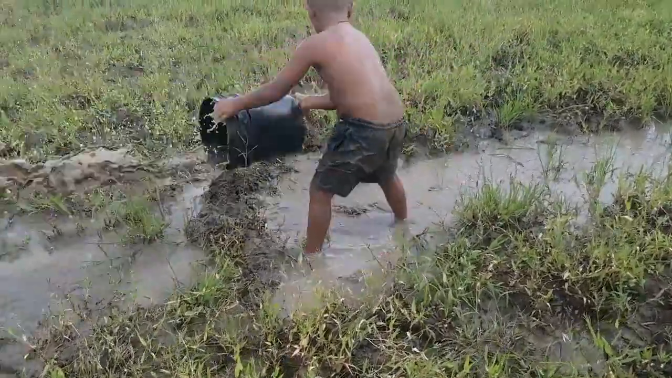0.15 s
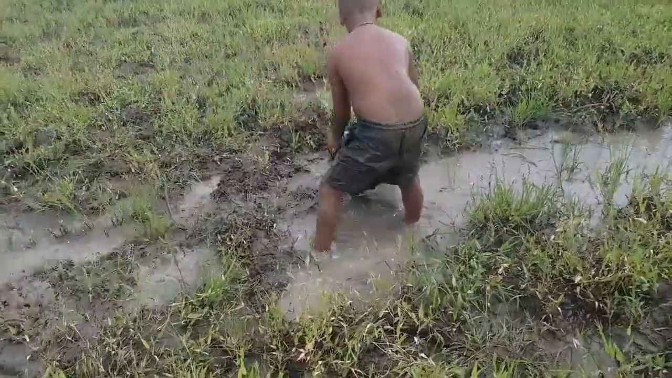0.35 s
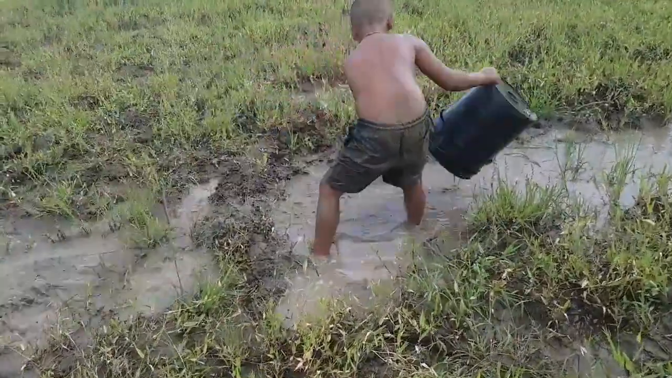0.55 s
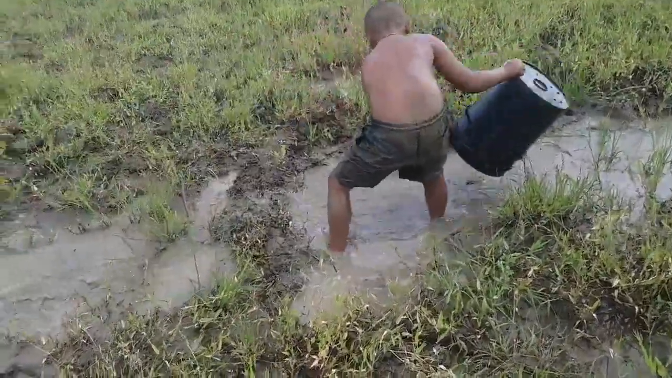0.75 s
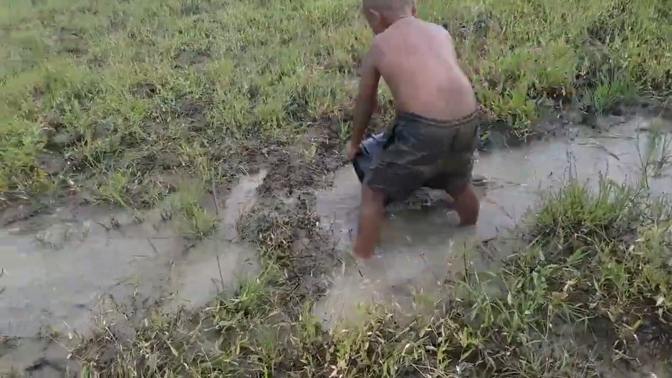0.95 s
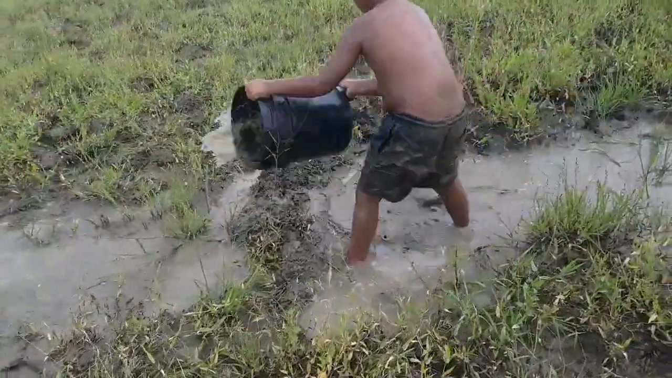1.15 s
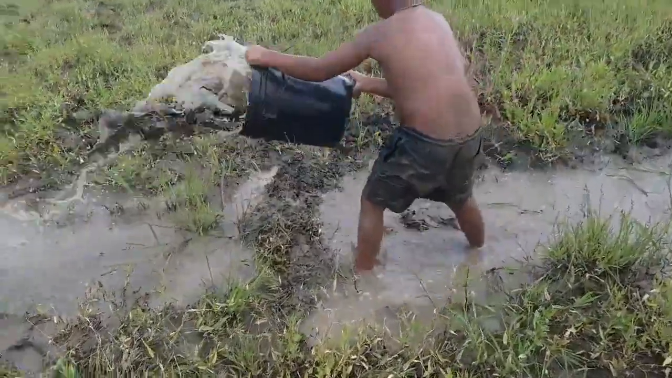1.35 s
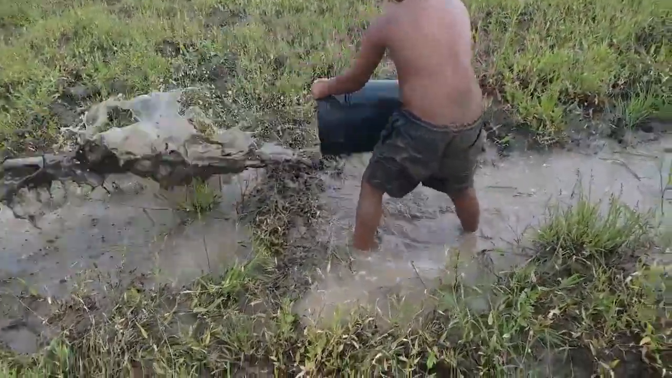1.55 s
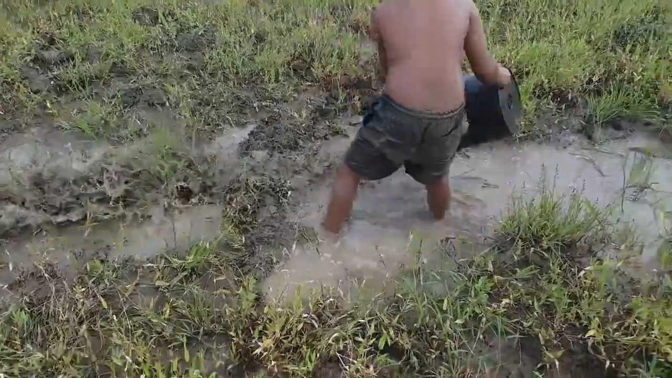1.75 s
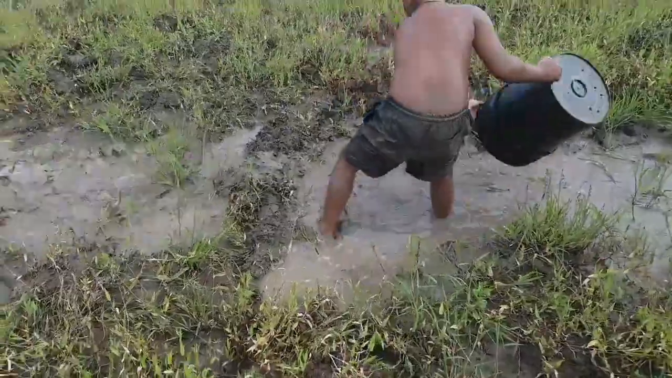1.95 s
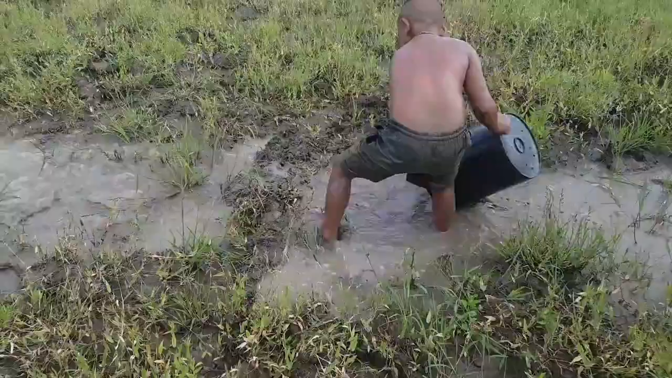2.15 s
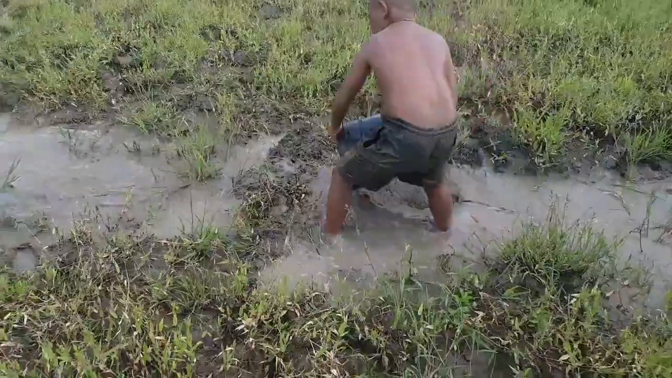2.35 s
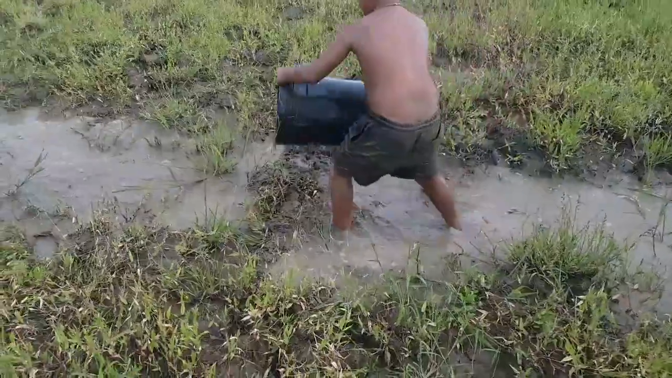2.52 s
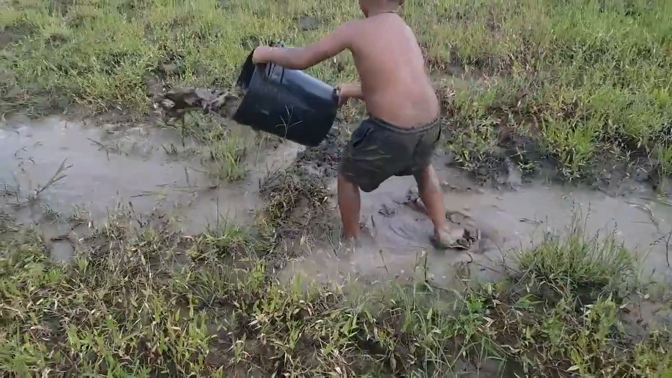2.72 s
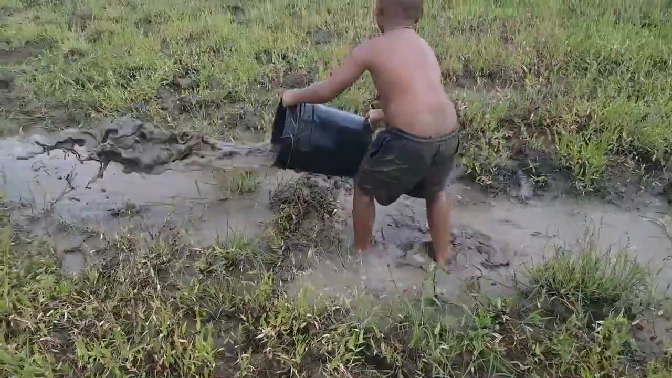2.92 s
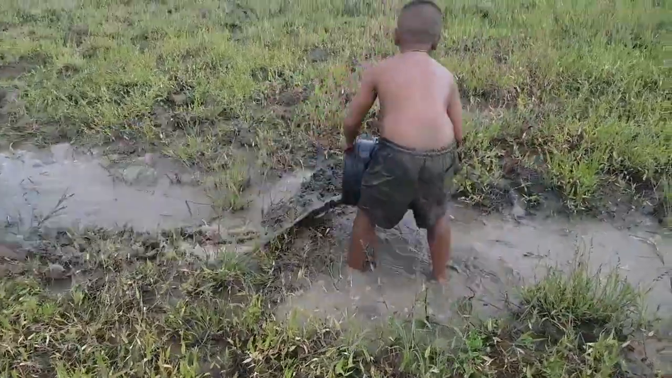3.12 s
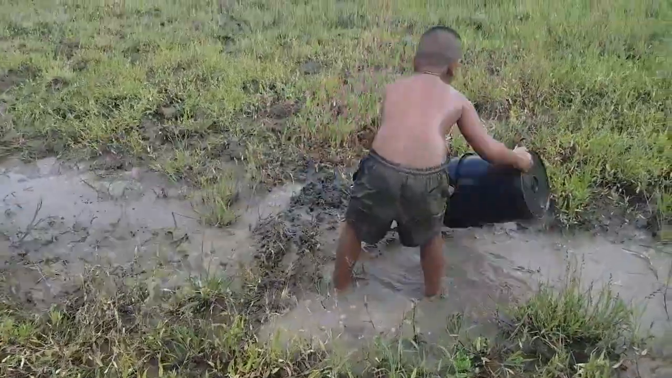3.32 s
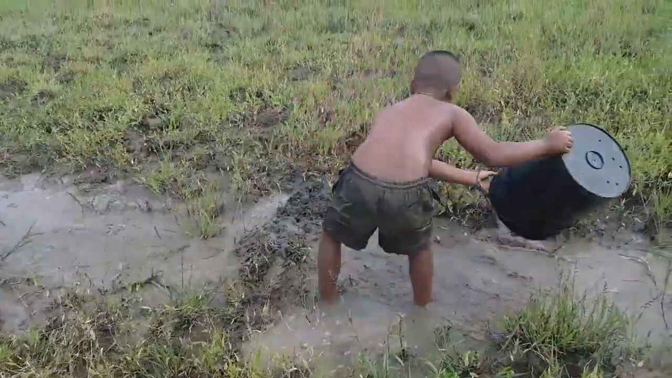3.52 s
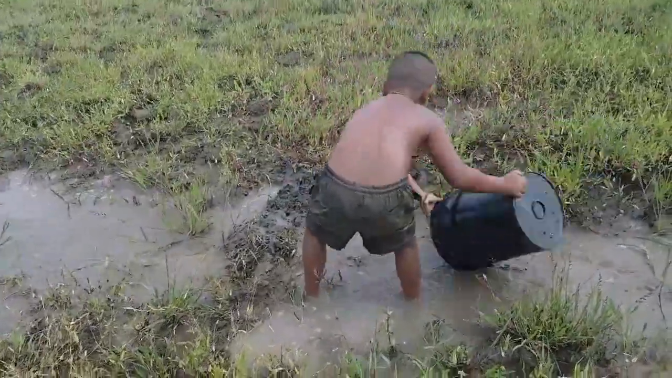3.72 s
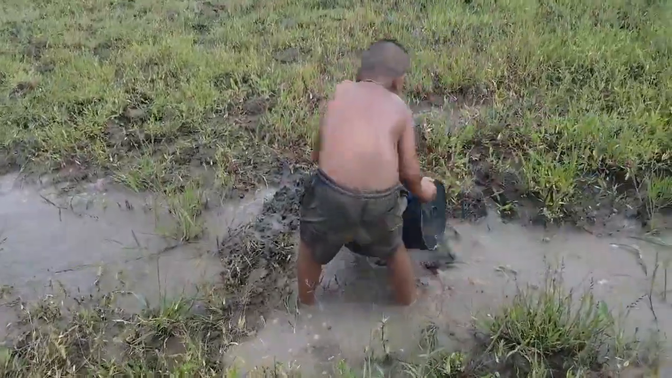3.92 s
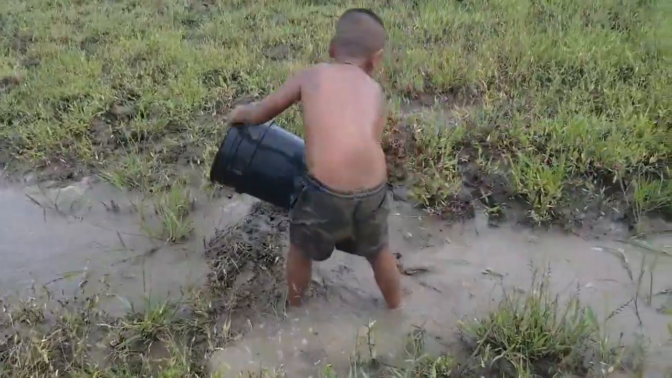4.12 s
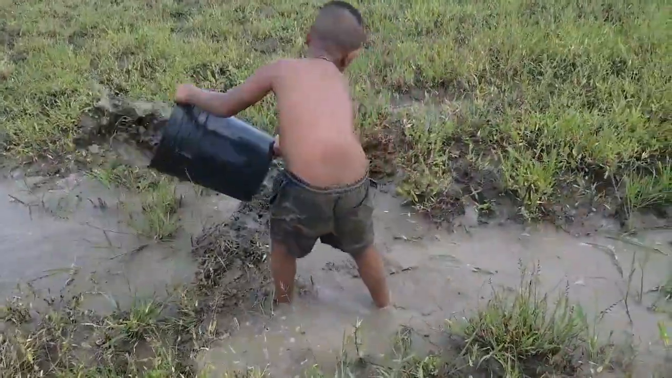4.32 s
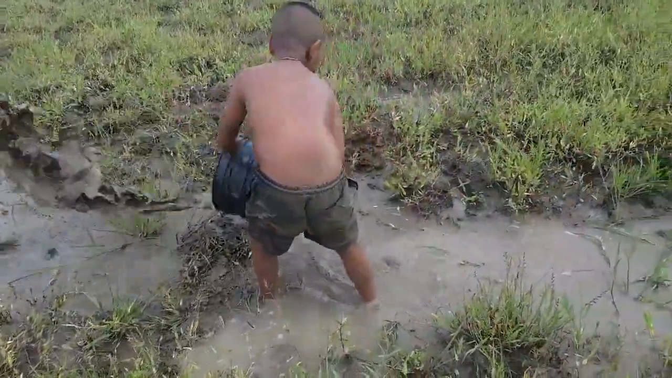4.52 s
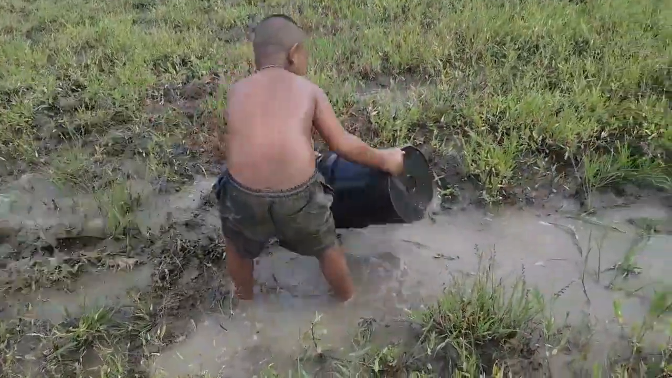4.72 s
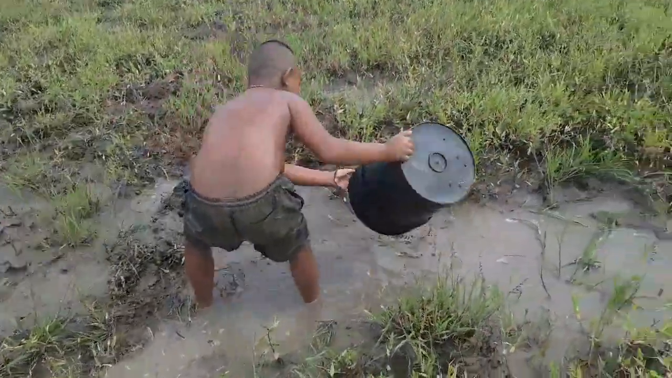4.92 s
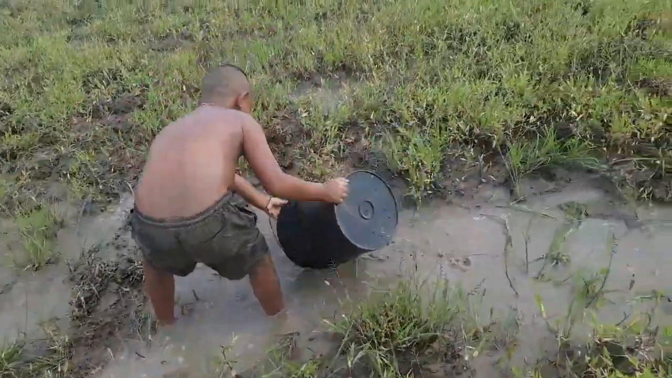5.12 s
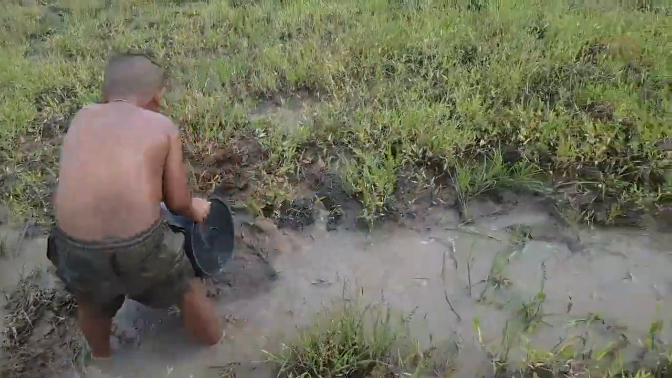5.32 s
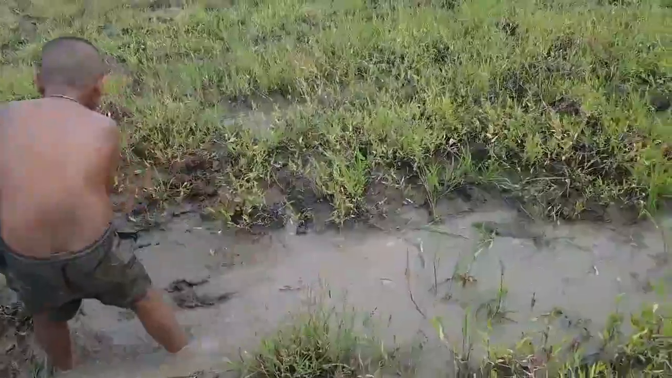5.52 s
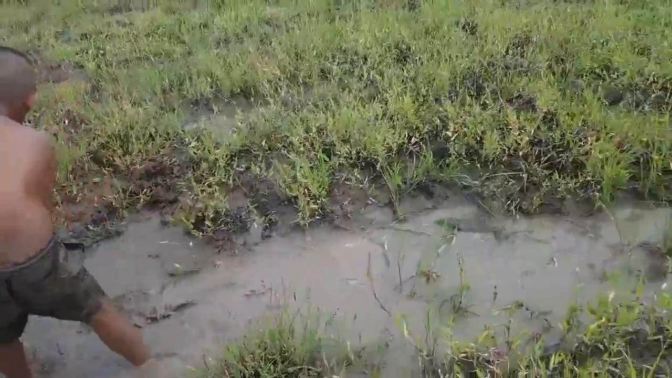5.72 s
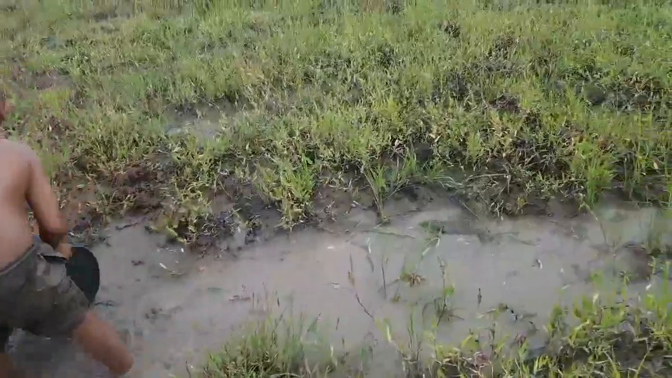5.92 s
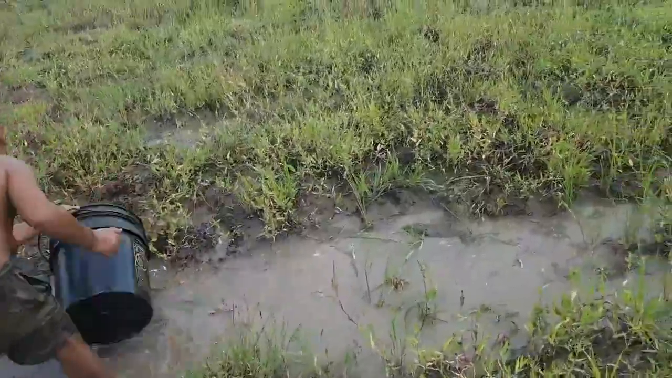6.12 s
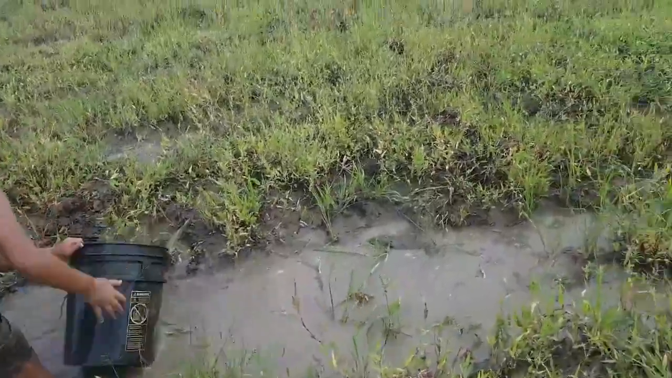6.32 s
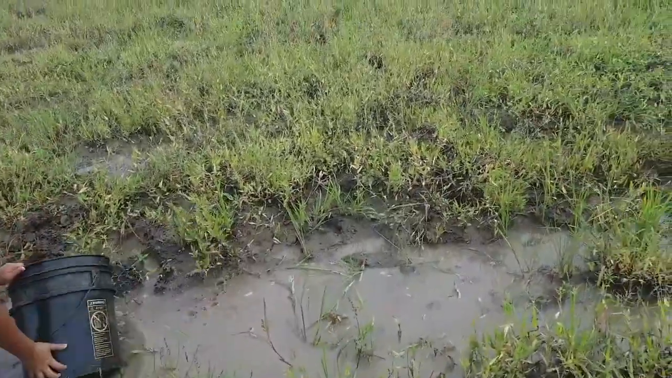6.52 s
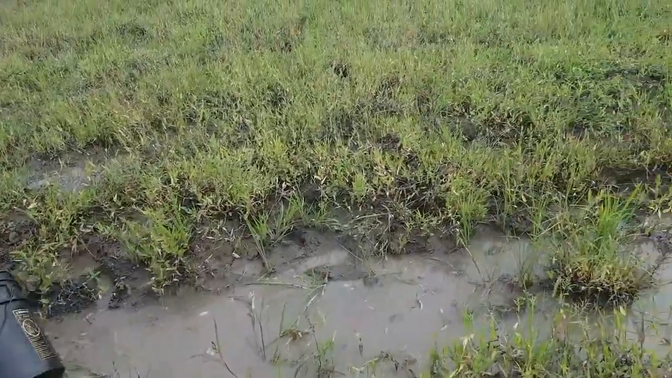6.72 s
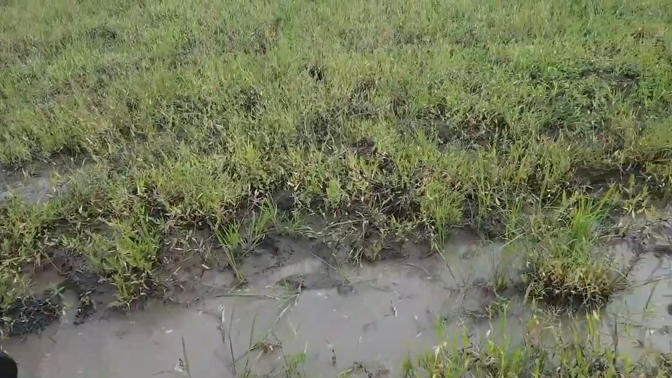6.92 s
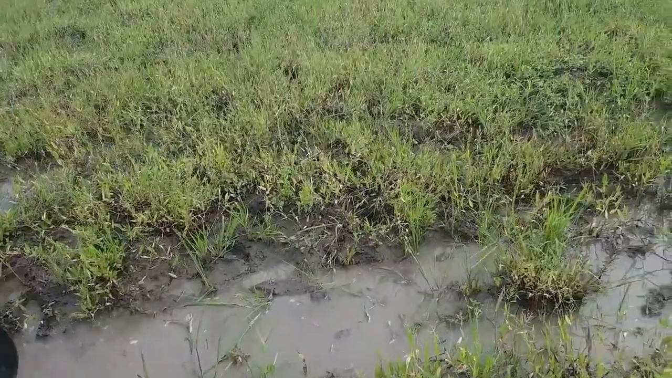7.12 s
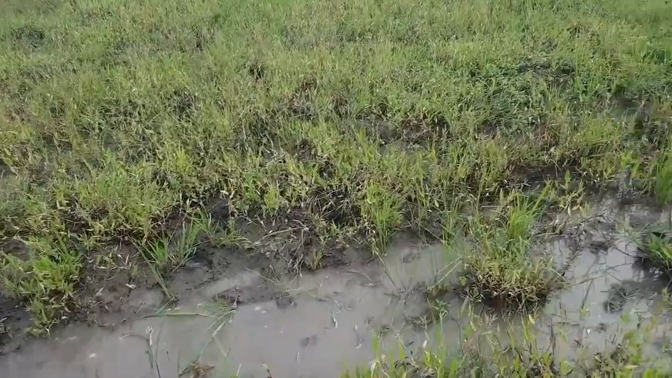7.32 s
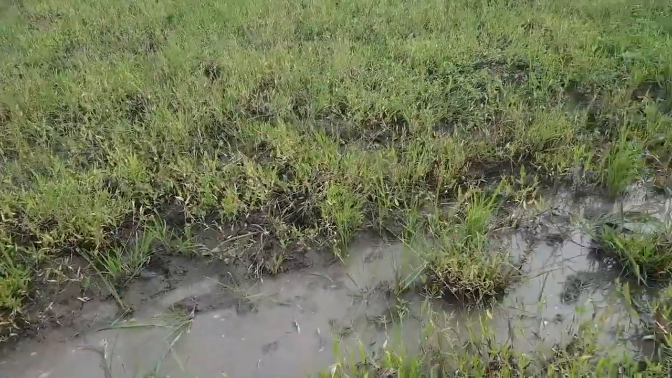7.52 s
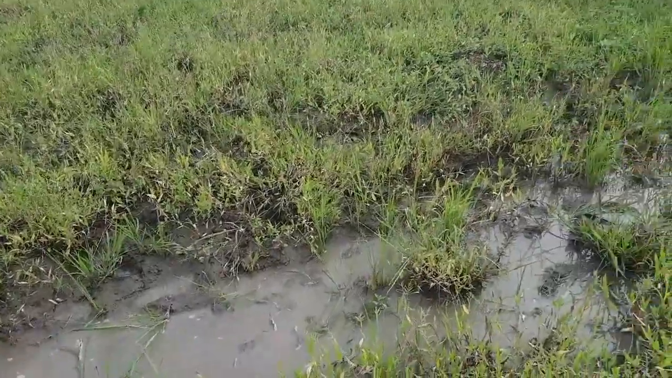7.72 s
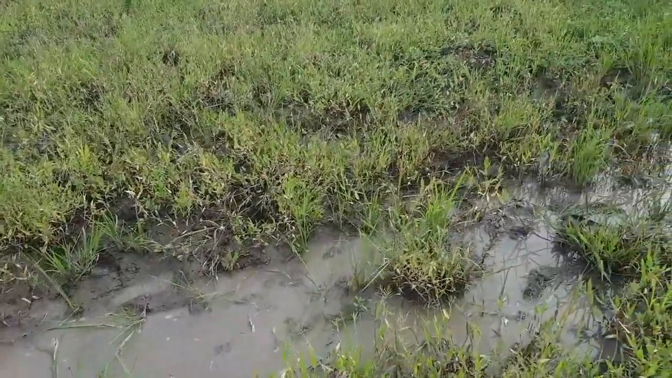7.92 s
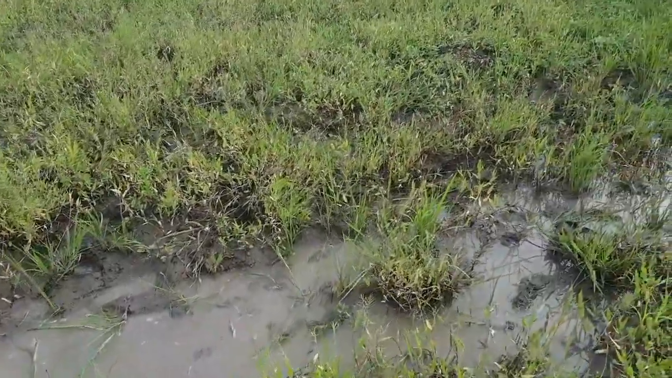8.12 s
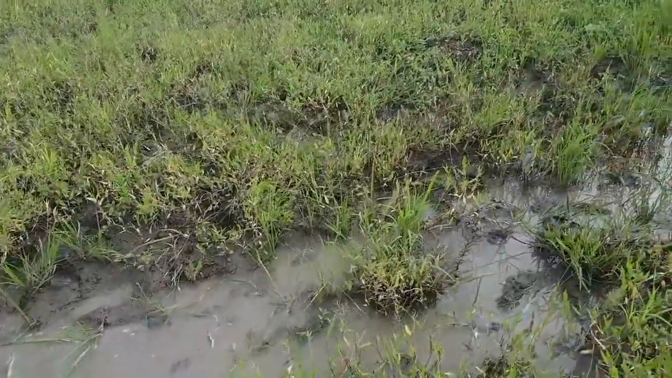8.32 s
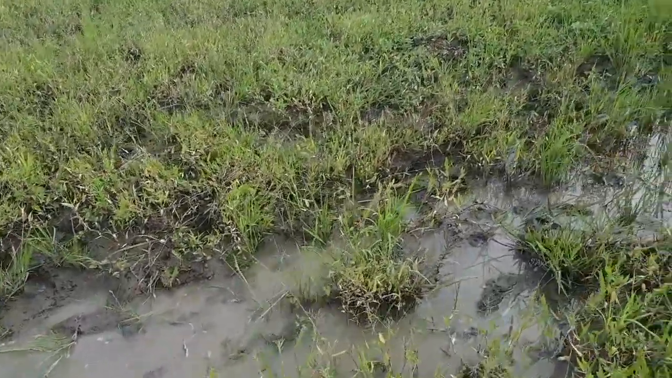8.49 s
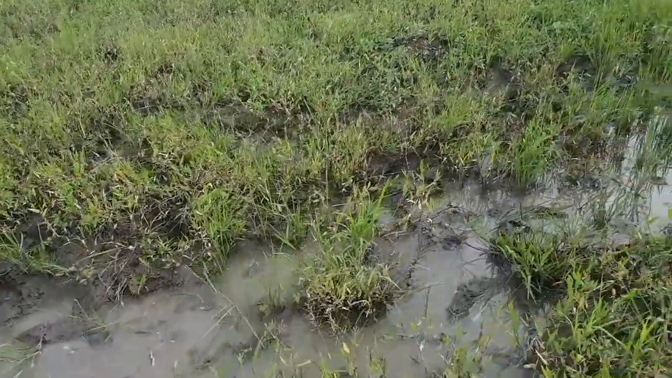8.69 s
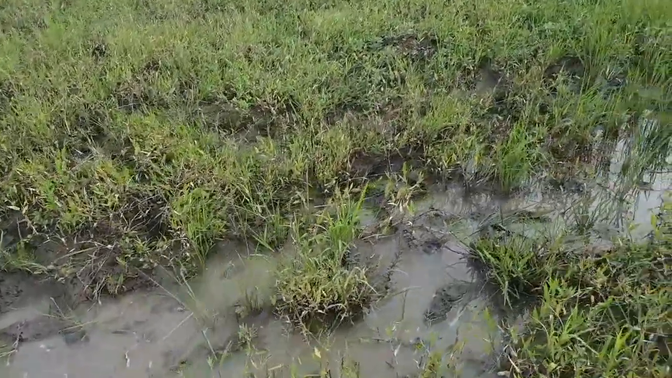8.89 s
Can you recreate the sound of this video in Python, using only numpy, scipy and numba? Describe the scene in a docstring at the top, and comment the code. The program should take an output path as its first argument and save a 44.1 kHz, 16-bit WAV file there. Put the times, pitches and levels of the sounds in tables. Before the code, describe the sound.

Close outdoor stereo from a handheld phone: a bucket plunges into a shallow puddle, gulps, and flings sheets of muddy water that slap down and patter. The rhythm is quick and irregular, then the scoops grow sparser and stronger, with dull plastic booms, trickling and single clear drips. A quiet airy hush, brief low wind thumps and a barely audible distant motor rising twice lie underneath.

```python
"""Someone bails a muddy puddle in an open field with a plastic bucket, a few metres from a phone.
Scooped and flung water gurgles, splashes and sprays: rains of short sines that swell, die and glide up.
Sheets of mud slap down in bursts of the same grains, lone drips ring, and the bucket booms on the water
while its wall modes ring along. Far off a small engine, two sines to a firing rate, revs up twice
over the hush of the field and low wind, both made of filtered noise."""
import sys
import numpy as np
from scipy import signal
from scipy.fft import rfft, irfft, next_fast_len
from scipy.io import wavfile
from scipy.ndimage import uniform_filter1d
from numba import njit

SR = 44100
rng = np.random.default_rng(int(sys.argv[2]) if len(sys.argv) > 2 else 0)


def output_pcm(signal):
    """Save a mono or channel-first signal as 16-bit PCM at the path in sys.argv[1].

    Samples are clipped to [-1, 1] before scaling.
    """
    pcm = np.clip(np.atleast_2d(signal).T, -1, 1) * 32767
    wavfile.write(sys.argv[1], SR, np.round(pcm).astype(np.int16))


N = 394694

# Slow level offset shared by the hush and the drizzle. Each row: time in seconds, offset in dB.
LULL = [(0, 4.5), (3, 1), (6.3, 6), (6.8, -7), (7.4, 0), (7.9, 3.5), (8.95, 3)]


def undb(db):
    """Turns decibels into an amplitude factor."""
    return 10 ** (np.asarray(db) / 20)


def unit(x):
    """Scales a signal to an rms of 1."""
    return x / np.sqrt(np.mean(x ** 2))


def walk(rate):
    """Random levels held 1 / rate s and slewed twice; spread near 1."""
    hold = int(SR / rate)
    steps = np.repeat(rng.standard_normal(N // hold + 1), hold)
    slewed = uniform_filter1d(uniform_filter1d(steps, hold), hold)
    return 4 / 3 * slewed[:N]


@njit
def ring(out, start, hz, t60, glide, size, rise):
    """Adds sines that swell, die and glide upward like bubbles nearing the surface."""
    for k in range(len(start)):
        first = max(int(np.ceil(start[k])), 0)
        late = first - start[k]  # a start between two samples keeps its exact phase
        decay_and_turn = (2j * np.pi * hz[k] - np.log(1000.) / t60[k]) / SR
        steps = int(t60[k] * SR * .8)
        wave, spin = size[k] * np.exp(decay_and_turn * late), np.exp(decay_and_turn)
        # over the whole grain the pitch climbs by the share `glide`
        bend = np.exp(2j * np.pi * hz[k] * glide[k] / SR / steps)
        open_rate = hz[k] / SR / rise
        shut, opening = np.exp(-open_rate * late), np.exp(-open_rate)
        for j in range(first, min(first + steps, len(out))):
            out[j] += wave.imag * (1 - shut)
            wave *= spin
            spin *= bend
            shut *= opening


def bearing(s):
    """Samples by which the left port leads: the puddle at the bailer's feet, or where a throw lands."""
    # Where the bailer stands. Each row: time in seconds, lead of the left port in samples.
    stance = [(0, 2), (2.2, 2.5), (3.0, -7.5), (3.8, 2.5), (5.25, 4.5), (6.05, 17), (6.4, 13.5), (6.5, 7.5),
              (6.8, 8.5), (7.5, 16.5), (8.95, 15.5)]
    # Thrown water lands to the left. Each row: from and to in seconds, lead of the left port in samples.
    throws = [(0, 0.93, 14.5), (1.588, 2.084, 11.2), (3.052, 3.708, 8), (4.66, 5.202, 12.4)]
    lead = np.interp(s, *np.transpose(stance))
    for begin, end, landing in throws:
        lead = np.where((s > begin) & (s < end), landing, lead)
    return lead


def at_ports(s, hz, t60, glide, size, place, rise=0.52):
    """Each grain swells over `rise` cycles; its place on the ground sets the time between the ports."""
    bass_lead, bass_lead_hz = 0.75, 1500  # below this pitch the lead shrinks to this share
    lag_spread = 2.8  # samples: the water covers a wide patch of ground
    out, hz = np.zeros((2, N)), np.clip(hz, 40., .45 * SR)
    lead_share = bass_lead + (1 - bass_lead) / (1 + (bass_lead_hz / hz) ** 4)
    lag = bearing(s) * lead_share + lag_spread * place
    for port, half_lag in enumerate((-lag / 2, lag / 2)):
        ring(out[port], s * SR + half_lag, hz, np.maximum(t60, 3e-4), glide + 0 * s, size, rise)
    return out


def stream(kind, glide, patchy_db, s, db):
    """A rain of bubbles around one size in uneven bursts; each rings out freely once born."""
    centre_hz, octaves, cycles, rate, spread_db, gain_db = kind
    count = int(rate * N / SR)
    when, luck, length = rng.random((3, count))
    pitch, place = rng.standard_normal((2, count))
    born = when * N / SR
    hz = centre_hz * 2 ** (octaves * np.clip(pitch, -2, 2))
    t60 = cycles * (.5 + length) / hz
    # some stand out from the rest in level; the sign is random
    size = undb(np.minimum(-spread_db * np.log(luck), 13.0)) * np.sign(length - .5)
    # a steady rain has an rms near 1 before the levels
    size /= np.sqrt(np.sum(size ** 2 * t60) * SR / (4 * np.log(1000) * N))
    patches_db = patchy_db * walk(24)[(when * N).astype(int)]
    size *= undb(np.interp(born, s, db) + gain_db + patches_db)
    return at_ports(born, hz, t60, glide, size, place)


def water():
    """Each surge swells and drains; bubbles of every size follow it, some ringing for more cycles."""
    # Grain kinds, deep to fine. Each: middle pitch in Hz, spread in octaves, mean cycles to fade 60 dB,
    # grains a second, level spread in dB, gain in dB.
    glug = (206, 0.92, 12.5, 297.5, 2.5, -7)
    slop = (424.5, -0.04, 4.5, 589, 1.5, -0.5)
    gurgle = (1018, 0.33, 7.2, 749, 0.83, 0.2)
    plop = (1340, .5, 52, 118, -2, -8.5)
    splash = (2359, 0.5644, 37, 1800, 1.57, 0.022)
    spray = (5360, 0.38, 4.1, 6500, 1.3, 0.72)
    patter = (10000, .6, 8, 298.5, 1.5, -12)  # sparse drops
    mist = (12303, 0.28, 39, 4998, -5, -10.5)
    # Surges of moving water. Each row: start in seconds, rise in seconds, gurgle level in dB before the
    # grain gain, fall in dB per second before each kind's share, then level over the gurgle in dB of
    # the deep glugs, the splash and the spray.
    surges = [(0.0, 0.039, -51, 74, -11, 7.5, 6), (0.283, 0.037, -42.5, 62, -25, 4, 5.5),
              (0.378, 0.063, -38, 132, -25, 18.5, 12), (0.498, 0.077, -47, 75, -6, 10, -13),
              (.6, 0.041, -52.5, 923, -12, 23.5, 18), (.69, 0.018, -76, 158, -10, 3, -10),
              (0.924, 0.0094, -46, 94, 8.5, 2, 1), (0.958, .006, -32, 495, -31, 1, -20),
              (1.008, 0.041, -34.5, 200, -4, -1, -2), (1.06, 0.028, -37, 60, -0.5, 1.5, -4.5),
              (1.187, 0.0085, -27, 217, -4, 1, -13), (1.3, .08, -41, 102, -19, -2.5, -7),
              (1.414, 0.0091, -39, 125, -23, 3, -3), (1.549, 0.049, -54.5, 87, -3, 9.5, 17),
              (1.655, 0.019, -48, 400, 7, 7, 10), (1.709, 0.018, -34.5, 39.5, -32, 2.5, -3),
              (1.759, 0.047, -29, 500, -27, 10.5, 2), (1.82, 0.074, -48.5, 75, -25, -18, 0.5),
              (2.17, 0.0071, -45, 84, -3, 0, -15), (2.258, 0.025, -33, 132, -22, -6, -13),
              (2.36, 0.058, -40, 209, 7.5, -4, -8.5), (2.45, 0.026, -49, 30, -4, 4, -4),
              (2.62, 0.16, -42, 132, -12, -0.5, -4), (2.88, 0.022, -38, 190, -18, -2.5, -11),
              (3.0, .1, -52.5, 100, 2, 12, 11), (3.158, 0.016, -33.5, 131, -27, 8.5, -0.5),
              (3.186, .008, -22, 254, -28, 3, -12), (3.25, 0.11, -43.5, 73, -28, 9, 6),
              (3.833, 0.085, -35, 192, -3, -1, -11.5), (4.018, 0.049, -42.5, 85, -1, 0.5, -9),
              (4.2, 0.063, -45.5, 59, -9, -1, -8), (4.33, 0.068, -44.5, 116, 0, -5, -5),
              (4.5, 0.029, -47.5, 93, -25, -15, -7), (4.72, 0.02, -33.5, 115, -25, 2, 3),
              (4.748, 0.014, -26.5, 70, -23, 0.5, -5.5), (5.208, 0.084, -38, 101, -5, 2, -6.5),
              (5.41, 0.026, -43.5, 190, 3, 4.5, -14), (5.5, 0.17, -41, 69, -14, -4.5, -17),
              (5.97, 0.11, -49.5, 98, -12, 7.5, 8.5), (6.069, 0.011, -21.5, 149, -21, -1, -11.5),
              (6.12, 0.019, -34, 41, -21, 2, -3), (6.429, 0.046, -23.5, 402, -31, 2, -14.5),
              (6.5, 0.066, -33.5, 356, -4, -6.5, -31), (6.69, 0.016, -54.5, 82, 5.5, 4, -24),
              (7.03, .01, -61.5, 152, 1.5, 4, -14), (7.13, 0.11, -62.5, 96, 9, 8.5, 7),
              (7.528, 0.054, -38, 183, -7, -8, -10.5), (7.649, 0.017, -38, 93, 0.5, -0.5, -9.5),
              (7.85, 0.055, -49, 41, -18, -2, -0.5), (8.323, .006, -39.5, 100, -21, -7, -2),
              (8.345, 0.024, -31.5, 107, -22, 1.5, -5), (8.598, 0.0097, -21, 393, -28, -1, -14.5),
              (8.68, 0.027, -33.5, 454, -4, -0.5, -11.5), (8.87, 0.013, -56, 20, -13, 10, -1)]
    slop_db = -4  # mud slop over the gurgle
    drizzle_db = -58.5  # the finest spray never quite rests
    # share of the fall that each kind takes: fine drops rain on longest
    glug_fall, slop_fall, gurgle_fall, splash_fall, spray_fall = 0.85, .95, 0.99, 1, 0.73

    s = np.arange(0, N, 88) / SR
    start, rise, top_db, fall, glug_db, splash_db, spray_db = (c[:, None] for c in np.transpose(surges))
    swell, after = np.clip((s - start) / rise, 0, 1), np.maximum(s - start - rise, 0)

    def flow(over_db, share, rest_db=-120):
        """Sums the power of all surges over a resting level, in dB."""
        surge = swell * undb(top_db + over_db - share * fall * after)
        return 10 * np.log10(np.sum(surge ** 2, axis=0) + undb(rest_db) ** 2)

    body = flow(0, gurgle_fall)
    fine = flow(spray_db, spray_fall, drizzle_db + np.interp(s, *np.transpose(LULL)))
    wet = stream(gurgle, 0.096, 0.57, s, body) + stream(plop, 0.63, 0.36, s, body)
    wet += stream(glug, 0.067, 1.2, s, flow(glug_db, glug_fall))
    wet += stream(slop, 0.31, 0.8, s, flow(slop_db, slop_fall))
    wet += stream(splash, 0.14, 2.68, s, flow(splash_db, splash_fall))
    wet += stream(spray, .06, 1.14, s, fine)
    wet += stream(mist, 0.022, 0.92, s, fine)
    wet += stream(patter, .05, 4.5, s, fine)
    return wet


def slaps(count=30):
    """Each slap traps pockets of near one size and a burst of mixed bubbles, and throws fine drops."""
    # Slaps of water and mud. Each row: time in seconds, level in dB before each layer's gain,
    # pitch in Hz, brightness (level of the fine drops before their gain) in dB.
    hits = [(0.12, -31, 874, -13), (0.184, -30, 2140, -32), (0.384, -21, 2540, -6), (0.417, -16, 1120, -13),
            (0.547, -14, 2930, -11), (0.575, -17, 2180, -12.5), (0.635, -32, 2360, -16),
            (0.66, -15.5, 2590, -20), (0.927, -42, 1030, -3), (0.964, -11.5, 2040, -43),
            (1.015, -28.5, 437, -8), (1.034, -14.5, 2030, -28), (1.173, -24.5, 746, -34),
            (1.194, -5.5, 1065, -30), (1.419, -18.5, 1036, -31), (1.578, -36.5, 1720, 0),
            (1.607, -20, 4030, -24), (1.664, -30, 426, -19), (1.665, -30, 890, -18),
            (1.699, -21.5, 2760, -6), (1.733, -17.5, 1070, -8.5), (1.749, -9.5, 1160, -14),
            (1.775, -9, 950, -14), (2.179, -27.5, 930, -21), (2.274, -4.5, 1585, -46),
            (2.277, -14.5, 890, -48), (2.386, -22, 800, -19), (2.415, -15, 1630, -19.5),
            (2.472, -28.5, 1490, -15), (2.621, -33, 2250, -13), (2.744, -32, 740, -10),
            (2.893, -28.5, 604, -17), (2.99, -29.5, 1030, -15), (3.086, -23, 1730, -17),
            (3.161, -26, 1240, -0.5), (3.191, -8, 422, -30), (3.193, -4.5, 914, -30),
            (3.208, -21, 1000, -5), (3.334, -20, 2350, -37.5), (3.726, -41, 572, -9),
            (3.849, -28, 1680, -12), (3.884, -20.5, 966, -20), (3.947, -16.5, 1000, -35),
            (4.026, -21.5, 2700, -21.5), (4.072, -25, 870, -26), (4.13, -27.5, 1300, -21),
            (4.231, -29, 655, -26), (4.283, -32, 837, -11), (4.404, -28, 764, -19), (4.53, -36.5, 720, -22),
            (4.566, -29.5, 1280, -32), (4.593, -36, 944, -14), (4.645, -28.5, 2800, -13),
            (4.702, -34, 6000, -4), (4.726, -28, 1450, -5.5), (4.752, -7, 1220, -21),
            (4.815, -15, 810, -29), (4.898, -28, 655, -22), (4.934, -13, 2030, -23),
            (5.08, -24.5, 2550, -27), (5.291, -26, 1020, -26), (5.409, -26, 397, -20),
            (5.438, -20, 1170, -33), (5.48, -27, 1520, -30), (5.529, -26.5, 1180, -27),
            (5.618, -36, 1160, -10), (5.98, -28.5, 2380, -15), (6.013, -31, 2880, -15),
            (6.037, -32, 990, -21), (6.074, -7, 575, -38), (6.273, -25.5, 450, -18),
            (6.445, -20, 1140, -17), (6.455, -4.5, 1180, -22), (6.562, -23, 793, -18),
            (6.702, -31, 1230, -37), (6.764, -38.5, 640, -9.5), (7.032, -31, 1660, -28),
            (7.548, -26.5, 2280, -21), (7.658, -22, 344, -19), (7.773, -32, 2620, -29),
            (7.955, -27.5, 580, -32), (8.201, -33.5, 2130, -12), (8.353, -16, 1970, -17.5),
            (8.531, -24, 2900, -38), (8.604, -15, 478, -25), (8.608, -9.5, 910, -28),
            (8.687, -25, 960, -35), (8.882, -22, 2130, -22)]
    s, db, hz, bright_db = (c[:, None] for c in np.transpose(hits))
    fade = 0.072  # seconds for the grain levels to fall 60 dB
    detune, uneven_db, sign, place = rng.standard_normal((4, len(s), count))
    when, drop_pitch = rng.random((2, len(s), count))
    late = fade * .4 * when ** 1.7
    landing = 1 - np.exp(-late / 0.0038)  # the sheet lands over a moment
    dying = undb(db - 60 * late / fade + 1.6 * uneven_db) * np.sign(sign) * landing

    def shower(pitch_hz, cycles, glide, gain_db, width):
        """Rings one layer of grains for every slap."""
        grains = (s - .001 + late, pitch_hz, cycles / pitch_hz, glide + 0 * late,
                  dying * undb(gain_db), width * place)
        return at_ports(*(a.ravel() for a in grains))

    pockets = shower(hz * 2 ** (0.016 * detune), 21.0, 0.035, -8.0, 1.0)
    mixed_hz = np.sqrt(hz * 1500) * 2 ** (0.586 * np.clip(detune, -2, 2))
    burst = shower(mixed_hz, 15.5, 0.43, -8.0, 1.0)
    drops = shower(3800 * 3.68 ** drop_pitch, 19.5, .02, bright_db + 10.5, 0.88)
    # the first contact
    s, db, hz = s[:, 0], db[:, 0], hz[:, 0]
    smack = at_ports(s, hz, 15.0 / hz, .05, undb(db - 1.0), 0 * s, 0.72)
    return smack + pockets + burst + drops


def drips():
    """One drop, one bubble: a short clear note that bends up."""
    # Lone drips off the bucket and the grass. Each row: time in seconds, level in dB, pitch in Hz.
    lone_drops = [(0.704, -31, 1230), (0.716, -35, 2420), (0.8, -53, 2500), (2.519, -42, 910),
                  (2.574, -42, 840), (2.649, -42, 840), (2.849, -31, 2620), (2.909, -33, 906),
                  (2.954, -33, 1730), (3.018, -43, 840), (3.112, -26, 4830), (3.495, -24.5, 6050),
                  (3.505, -37.5, 990), (6.64, -54, 910), (7.034, -35, 1720), (7.295, -61, 600),
                  (4.595, -45, 990), (4.687, -35, 4700), (5.029, -32, 456), (5.166, -72, 1980),
                  (5.349, -33.5, 740), (6.209, -25.5, 763), (6.349, -25, 2100), (6.619, -47, 805),
                  (6.884, -47, 516), (6.975, -38, 2050), (7.079, -47, 2420), (7.14, -43, 2980),
                  (7.154, -48, 845), (7.239, -38, 2450), (7.579, -28, 1045), (8.088, -40, 2640),
                  (8.139, -45, 2480), (8.715, -23.5, 3150), (8.909, -26, 1080)]
    s, db, hz = np.transpose(lone_drops)
    return at_ports(s, hz, 34.0 / hz, 0.074, undb(db), 0.6 * rng.standard_normal(len(s)))


def hollow(wet):
    """Adds resonances at the bands that the wet ground and the phone favour."""
    # Each row: middle in Hz, width in Hz, level of the added band in dB.
    bands = [(840, 264, -9), (2740, 780, -12.5)]
    return wet + sum(undb(db) * signal.lfilter(*signal.iirpeak(hz, hz / width, fs=SR), wet)
                     for hz, width, db in bands)


def bucket():
    """The air inside booms at a pitch set by the water it holds; the plastic wall rings along."""
    # Blows on the bucket. Each row: time in seconds, boom level in dB, boom pitch in Hz,
    # boom 60 dB decay in seconds, wall over boom in dB.
    knocks = [(1.042, -28.5, 221.4, 0.15, -13), (1.199, -39, 89, 0.18, -25), (2.278, -46.5, 118, 0.52, 5),
              (2.42, -33.5, 232, 0.19, -20), (5.43, -31.5, 226, 0.11, -20),
              (6.105, -29.5, 113.7, 0.45, -12), (6.465, -33, 226, 0.27, 5), (6.565, -50, 240, .1, 6),
              (6.787, -36, 169, 0.057, -35), (7.66, -25.5, 156, 0.11, -13), (7.72, -45.5, 224, 0.36, -25),
              (8.609, -30.5, 110, 0.079, 0.5)]
    # Modes of the wall. Each row: pitch in Hz, relative level in dB, 60 dB decay in seconds.
    wall_modes = [(257, -9, 0.37), (808, -1, 0.34), (1390, 2, 0.27), (1470, 3.5, 0.16), (476, -12, 0.13)]
    s, db, boom_hz, boom_t60, wall_db = np.transpose(knocks)
    boom = at_ports(s, boom_hz, boom_t60, 0.0085, undb(db), 0 * s)
    hz, mode_db, t60 = np.transpose(wall_modes)
    size = undb((db + wall_db)[:, None] + mode_db)
    flat = 0 * size  # spreads a row or column over every blow and mode
    grains = (s[:, None] + flat, hz + flat, t60 + flat, flat, size, flat)
    wall = at_ports(*(a.ravel() for a in grains))
    return boom + wall


def engine():
    """Only the firing tone and a weak octave carry this far, wavering in the air."""
    # Two revs of the far engine. Each row of a rev: time in seconds, firing rate in Hz, level in dB,
    # the last two before the random waver.
    revs = [
        [(2.2, 51.4, -72), (2.9, 51.6, -64), (3.3, 67.7, -61), (3.6, 81.5, -58), (4.2, 94, -63),
         (5.2, 95.8, -58), (5.5, 88, -66)],
        [(7.8, 57.4, -71), (8.15, 63, -61), (8.55, 86.8, -56), (8.83, 91, -63), (8.95, 91.2, -61)],
    ]
    t, out = np.arange(N) / SR, 0
    for rev in revs:
        s, hz, db = np.transpose(rev)
        firing_hz = np.interp(t, s, hz) * (1 + 0.0063 * walk(36))
        turn = 2 * np.pi * np.cumsum(firing_hz) / SR
        edge = np.clip(np.minimum(t - s[0], s[-1] + 0.12 - t) / 0.087, 0, 1)
        level = undb(np.interp(t, s, db) + 0.8 * walk(6.4))
        out = out + edge * level * (np.sin(turn) + 0.27 * np.sin(2 * turn))
    return out


def field():
    """Shaped noise: a hush most alike at both ports near 260 Hz, and wind that buffets each mostly alone."""
    # Colour of the hush. Each row: frequency in Hz, relative level in dB.
    hush_colour = [(45, -10), (90, -3), (250, -2), (600, -6), (1500, -0.5), (3000, -3.5), (4500, -40.5),
                   (9500, -26), (15500, -12)]
    # Gusts at the ports. Each row: time in seconds, level in dB before the flutter,
    # seconds from the peak to 1/e.
    gusts = [(1.12, -61, .2), (2.5, -71, 0.5), (3.663, -68, 0.57), (5.078, -55, 0.33), (5.597, -59, 0.29),
             (6.3, -57, 0.21), (7.26, -56, 0.26), (8.016, -58, 0.018), (8.25, -48, 0.025),
             (8.2, -61.5, 0.43)]
    hush_db, breeze_db = -58.5, -91  # before their slow and quick wavering
    t, size = np.arange(N) / SR, next_fast_len(N)
    f = np.fft.rfftfreq(size, 1 / SR) + 1  # 1 Hz up, to keep the logarithm finite
    colour_hz, colour_db = np.transpose(hush_colour)
    colour = undb(np.interp(np.log(f), np.log(colour_hz), colour_db))
    both, apart = rfft(rng.standard_normal(size)), rfft(rng.standard_normal((2, size)))
    share = .8 / (1 + np.log2(f / 260) ** 2)  # power common to both ports
    air = np.sqrt(share) * both + np.sqrt(1 - share) * apart
    hush_level = undb(hush_db + 0.54 * walk(0.88) + np.interp(t, *np.transpose(LULL)))
    hush = unit(irfft(air * colour, size)[:, :N]) * hush_level
    rumble = (f / 18) ** 2 / (1 + (f / 18) ** 2) / (1 + (f / 60) ** 2)
    wind = unit(irfft(air * rumble, size)[:, :N])
    blow = undb(breeze_db) + sum(undb(db) * np.exp(-((t - s) / width) ** 2) for s, db, width in gusts)
    return hush + wind * blow * undb(1.3 * walk(16))


def scene():
    """Water and bucket without deep bass, over the engine and the field."""
    wet = hollow(water() + slaps() + drips()) + bucket()
    # small splashes radiate no deep bass
    no_bass = signal.butter(2, 75, "high", fs=SR, output="sos")
    return signal.sosfilt(no_bass, wet) + engine() + field()


def record(dry):
    """The body of the phone tilts the treble between the ports as it turns; the recorder cuts the top."""
    # The phone turns. Each row: time in seconds, treble of the left port over the right in dB.
    shade = [(0, -2.5), (.8, 0), (1.4, 7), (3, 6), (5.8, 7), (6.5, 4.5), (8.95, 5)]
    shade_hz, top_hz = 1300, 15850
    high = signal.lfilter(*signal.butter(1, shade_hz, "high", fs=SR), dry)
    shade_db = np.interp(np.arange(N) / SR, *np.transpose(shade))
    ports = dry + high * (undb(np.array([shade_db, -shade_db]) / 2) - 1)
    return signal.sosfilt(signal.ellip(10, .2, 80, top_hz, fs=SR, output="sos"), ports)


dry = scene()
out = record(dry)
output_pcm(out)
```